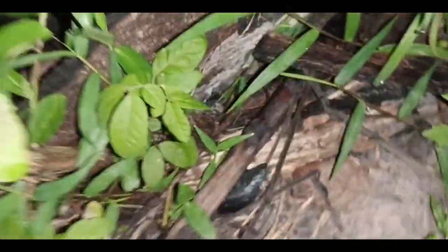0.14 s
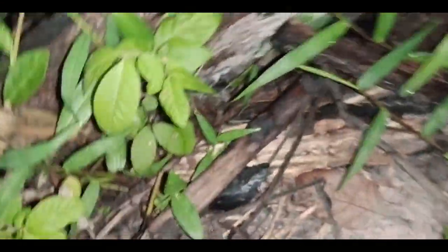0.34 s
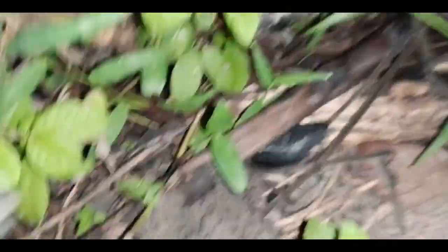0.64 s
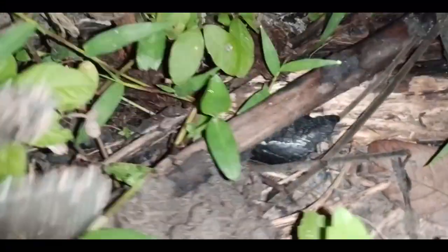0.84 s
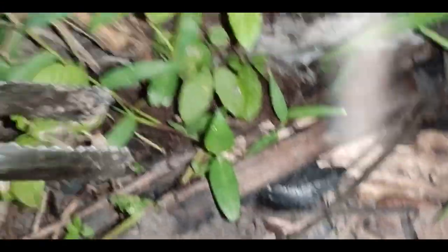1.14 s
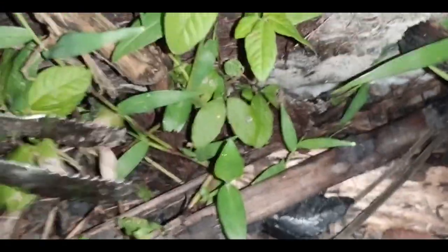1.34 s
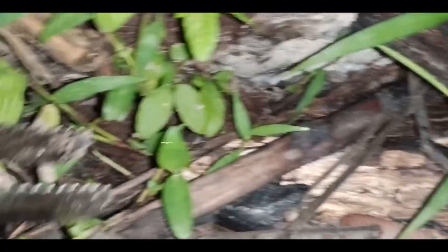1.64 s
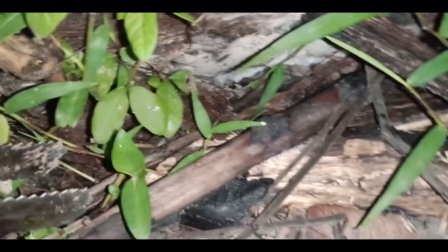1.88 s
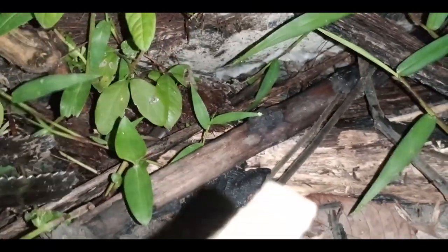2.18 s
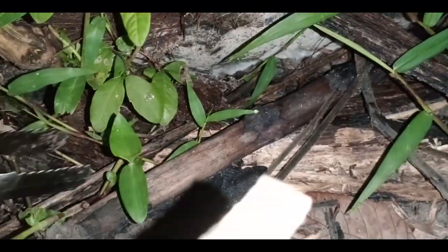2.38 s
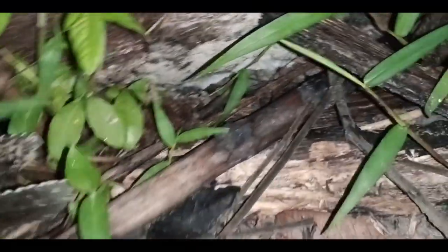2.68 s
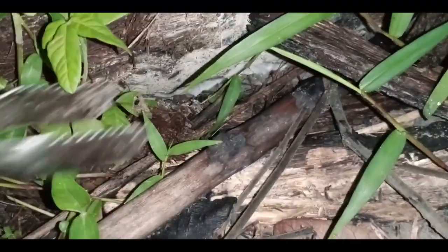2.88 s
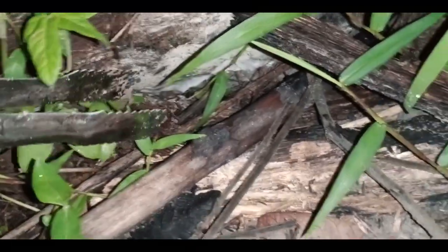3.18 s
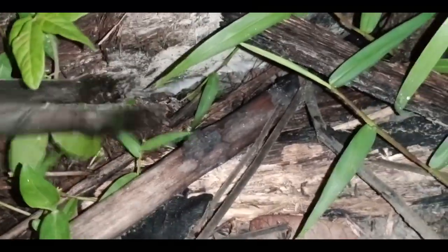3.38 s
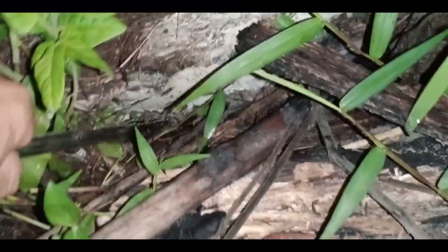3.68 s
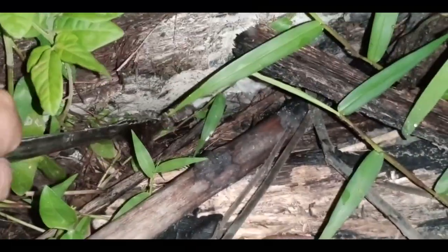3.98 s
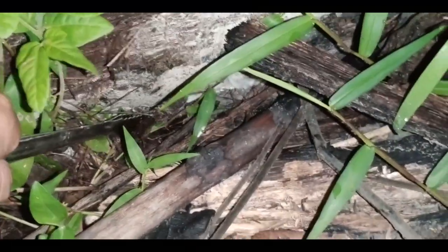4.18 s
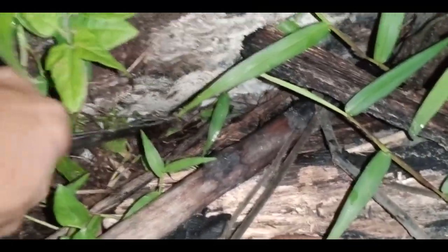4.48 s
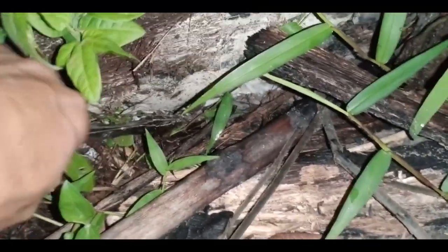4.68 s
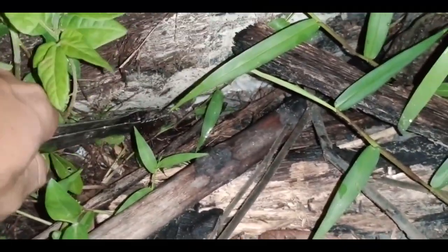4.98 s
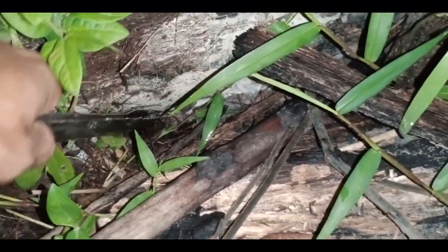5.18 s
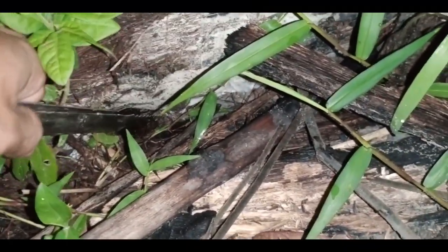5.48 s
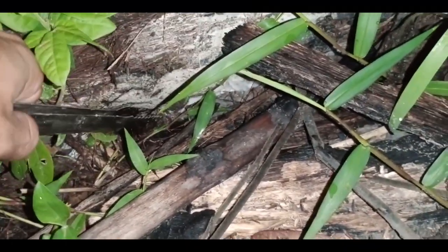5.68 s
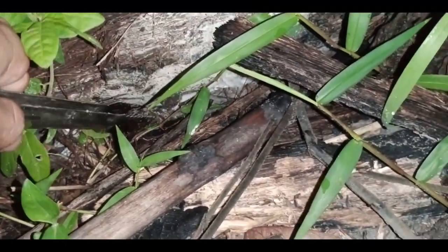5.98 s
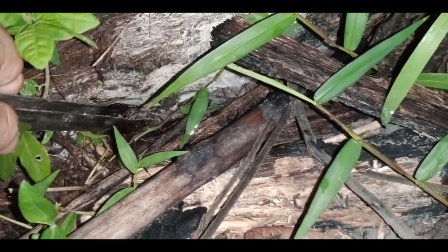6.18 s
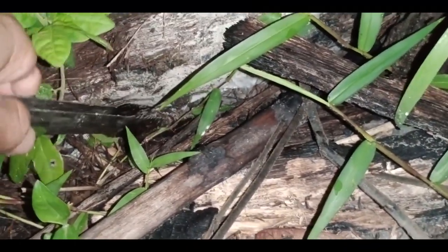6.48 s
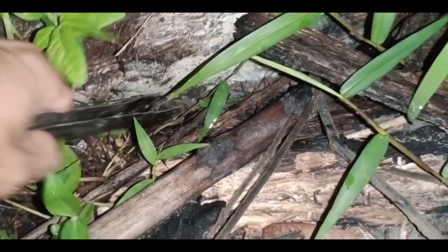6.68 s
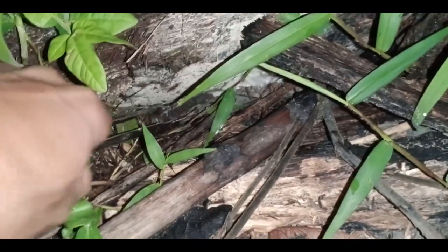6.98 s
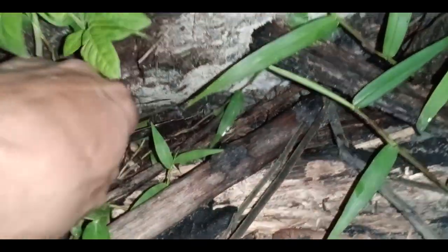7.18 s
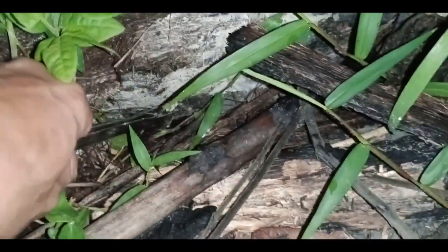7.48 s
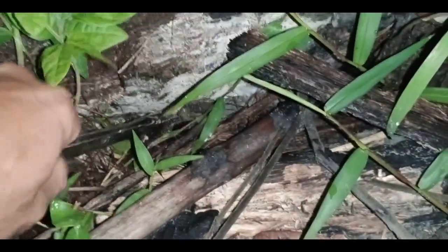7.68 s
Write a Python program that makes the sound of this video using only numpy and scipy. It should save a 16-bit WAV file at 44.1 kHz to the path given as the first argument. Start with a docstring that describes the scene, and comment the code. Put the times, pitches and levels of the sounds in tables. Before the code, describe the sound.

Outdoors at night, a handheld phone close to the undergrowth catches dull case knocks, brittle twig snaps and rustling leaves at first, then mostly insects: a wide steady hiss, fine trill, quick high chirps, thin buzzes, short falling whistles and one spell of purring. A rough crunchy scrape breaks in midway; later the chorus dips as twigs crackle in a burst, and a sharp crack comes near the end.

```python
"""A night field, heard close to a handheld phone. A far insect chorus of filtered noise swells up in the first half
second over a low rumble and a steady trill. Fingers knock the phone's case, mostly in the first second and a half,
and tongs push through leaves and twigs: grains of noise scrape, bursts of fractures snap. Near singers, built from
wing strokes, join in: chirper and buzzer within the first second, then whistler, then one spell of purrs. A harder
scrape comes after three seconds; after six the chorus sinks, and more snaps and scrapes run on to the end."""
import sys
import numpy as np
from scipy import signal
from scipy.fft import rfft, irfft
from scipy.io import wavfile
from scipy.ndimage import uniform_filter1d

SR = 44100
rng = np.random.default_rng(int(sys.argv[2]) if len(sys.argv) > 2 else 0)


def put_to_file(sound):
    """Save the sound as 16-bit audio at rate SR, in the file named by the first command-line argument."""
    columns = np.atleast_2d(sound).T  # one column per channel
    safe = np.clip(columns, -1, 1)
    whole_steps = np.round(safe * 32767)
    wavfile.write(sys.argv[1], SR, whole_steps.astype(np.int16))


N = 346185
T = np.arange(N) / SR  # time of every sample, s


# near buzzer, phrases that swell and stop short: start_s, stop_s, full_peak_db, swell_s
BUZZ_PHRASES = [(.42, 1.391, -67, 0.16), (1.72, 2.39, -52, 0.66), (2.62, 3.149, -52.5, 0.42),
                (3.423, 3.887, -52, 0.15), (4.078, 4.541, -53, 0.26), (4.718, 5.29, -54.5, 0.27),
                (5.546, 6.065, -55.5, .17), (6.38, 6.618, -61, .15), (6.795, 7.18, -56.5, 0.12),
                (7.467, 7.902, -57.5, 0.17)]


def buzzer(wing_hz=11175.0, sag_hz=634.0, soft_db=-8.5, rate_hz=132.0):
    """Fast falling strokes at a steady rate; a phrase starts soft and flat, then gathers effort."""
    out = np.zeros(N)
    for start, stop, full_db, swell in BUZZ_PHRASES:
        for t in np.arange(stop, start, -1 / rate_hz):  # counted back from the stop
            slack = max(1 - (t - start) / swell, 0)
            path_hz = (wing_hz - sag_hz * slack) * np.array([1.045, 0.955])
            gain = undb(full_db + soft_db * slack)
            add(out, t - 1 / rate_hz, gain * stroke(5.3, path_hz, rough=0.11))
    return out


# near chirper, about three chirps a second: first_closing_stroke_middle_s
CHIRP_TIMES = [0.525, 0.877, 1.2, 1.524, 1.868, 2.209, 2.51, 2.865, 3.19, 3.602, 3.919, 4.239, 4.588, 4.926,
               5.255, 5.608, 5.943, 6.314, 6.63, 6.991, 7.32, 7.699]
# a fainter chirper, evenly spaced chirps: first_call_s, gap_s, calls, peak_db
NEIGHBOUR_CHIRPS = [(.19, .211, 2, -60.5), (1.6, .32, 1, -62), (2.789, .32, 2, -62),
                    (3.688, .323, 3, -61.5)]


def chirper(gap_s=0.0318):
    """Three closing strokes arch in pitch; a fainter, higher opening stroke comes before each."""
    level_db = following(-53.5, share=0.74)
    calls = [(s, level_db[int(s * SR)]) for s in CHIRP_TIMES] + runs(NEIGHBOUR_CHIRPS)
    opening_calls = [(s - gap_s / 2, db - 5.0) for s, db in calls]
    closing_hz, opening_hz = (9600, 9560, 9900, 9880, 9450), (10250, 10200, 10000)
    closing = singer(calls, count=3, gap_s=gap_s, ms=19.0, path_hz=closing_hz, rough=0.25)
    opening = singer(opening_calls, count=3, gap_s=gap_s, ms=13.0, path_hz=opening_hz, rough=0.47)
    return closing + opening


# near whistler, evenly spaced calls: first_call_s, gap_s, calls, peak_db
WHISTLES = [(1.66, .18, 1, -53), (3.565, 0.2, 5, -60), (4.434, 0.16, 3, -55), (5.02, .18, 1, -57),
            (6.199, .13, 3, -56), (7.18, .131, 6, -57)]


def whistler():
    """Each call is two longer wing strokes, heard as falling notes."""
    return singer(runs(WHISTLES), count=2, gap_s=0.047, ms=30.0, path_hz=(4560, 4400, 4150, 3900), rough=0.15)


# near purrer, evenly spaced purrs: first_call_s, gap_s, calls, peak_db
PURRS = [(1.93, .233, 6, -52.5)]


def purrer():
    """Each purr is five short, slightly falling wing strokes."""
    return singer(runs(PURRS), count=5, gap_s=0.023, ms=11.0, path_hz=(4350, 4100), rough=0.22)


# twigs and leaves close by: start_s, body_peak_db, body_pitch_hz, length_ms, crisp_top_against_body_db
TWIG_SNAPS = [(.471, -26.5, 2350, 5.5, -37), (.482, -43, 1420, 4, -30), (0.6366, -33, 2060, 6.7, -13),
              (.678, -43.5, 2000, 3.6, -6), (.997, -21.5, 3080, 2.6, -35), (3.238, -42, 1000, 7.2, -14),
              (3.254, -36.5, 1470, 12, -17), (3.282, -32, 2400, 4.6, -4), (3.301, -33, 2600, 4., -6),
              (3.314, -32.5, 2330, 5.7, -8), (3.353, -24.5, 3000, 7.4, -4), (3.647, -42, 3000, 3., -1),
              (4.316, -41, 3000, 4., -5), (4.634, -41.5, 1320, 6.6, -18), (4.655, -41, 2260, 3.1, -25),
              (6.378, -38, 1310, 7.8, -20), (6.394, -38, 1290, 5, -16), (6.402, -35.5, 1400, 6., -10),
              (6.426, -35, 1360, 8.9, -11), (6.441, -36.5, 1500, 7.2, -15), (6.458, -32.5, 1400, 5.9, -22),
              (6.4695, -39, 1110, 2.6, -20), (6.483, -33, 1270, 3.3, -24), (6.497, -35, 1120, 2.5, -11),
              (6.512, -37, 1200, 2.9, -18), (6.5191, -33, 1310, 5.9, -9), (6.859, -41, 1280, 4.9, -14),
              (7.223, -44.5, 1400, 3.7, -20), (7.328, -42.5, 1290, 7.8, -10),
              (7.397, -42.5, 1330, 5.3, -20), (7.463, -45.5, 1620, 3.6, -1), (7.5271, -28.5, 1480, 4, -12)]


def snaps():
    """A first fracture and a few milliseconds of smaller ones ring the wood and a crisp top."""
    out = np.zeros(N)
    t = np.arange(1200) / SR
    for s, db, hz, ms, top_db in TWIG_SNAPS + crackles():
        fading = np.exp(-(1000 * t / (0.79 * ms)) ** 2)
        fractures = (rng.random(len(t)) < 0.3) * rng.standard_normal(len(t)) * fading
        fractures[0] = -2.96
        body = signal.fftconvolve(fractures, wood(t, hz))[:len(t)]
        edge = band(fractures, hz / 3, 8000)
        top = band(rng.standard_normal(len(t)) * fading, 8500, 15500)
        snap = peak_one(body) + undb(top_db) * peak_one(top) + undb(-16.5) * peak_one(edge)
        add(out, s, undb(db) * snap)
    return out


# the fallen branch and its twigs: mode_hz
BRANCH_MODES_HZ = (520, 990, 1390, 1834, 2610, 3430, 3730)


def wood(t, hz, ring_cycles=17.2):
    """The ring of the wood; a blow wakes most the modes near its own pitch, and high modes die sooner."""
    detune = 1 + 0.047 * rng.standard_normal((len(BRANCH_MODES_HZ), 1))
    modes = np.array(BRANCH_MODES_HZ)[:, None] * detune
    # short rings start louder
    weight = np.sqrt(modes / hz) * np.exp(-(np.log2(modes / hz) / 0.42) ** 2)
    # a mode has fallen 60 dB after ring_cycles
    decay = np.exp(-np.log(1000) * modes * t / ring_cycles)
    return np.sum(weight * np.sin(2 * np.pi * modes * t) * decay, axis=0)


# leaves dragged along the tongs: start_s, full_s, let_go_s, silent_s, body_level_db, crisp_top_against_body_db
LEAF_DRAGS = [(0.181, 0.255, 0.2, .6, -52.5, -24), (0.304, 0.797, 0.81, 1.3, -59.5, -14),
              (3.2, 3.28, 3.305, 3.39, -45.5, -8), (6.353, 6.389, 6.575, 6.66, -55, -15),
              (6.998, 7.4, 7.5, 7.56, -62.5, -13)]
# spectrum of the leaf body: pitch_hz, relative_level_db
LEAF_BODY = [(350, -2), (800, 0), (1400, -0.5), (2800, 1.5), (5000, -23)]
# spectrum of the crisp leaf edges: pitch_hz, relative_level_db
LEAF_EDGES = [(5500, -2), (8000, -7), (12800, 5), (15500, -11)]


def scrapes(grains_per_s=5000.0, spread_db=2.5):
    """Dense grains of unequal size shake the leaf body and its crisp edges."""
    hits = rng.random(N) < grains_per_s / SR
    size_db = spread_db * np.minimum(rng.exponential(size=N), 4.0)
    grains = hits * undb(size_db) * rng.standard_normal(N)
    grains *= undb(2.0 * walk(110))  # the leaves catch and slip
    body, crisp = colour(grains, LEAF_BODY), colour(grains, LEAF_EDGES)
    out = np.zeros(N)
    for *drag, top_db in LEAF_DRAGS:
        out += undb(drag_db(*drag)) * (body + undb(top_db) * crisp)
    return out


def drag_db(start, full, let_go, silent, db, edge_db=-27):
    """Attack, hold and release of one drag; edge_db is its level at either end against full."""
    return db + np.interp(T, [start, full, let_go, silent], [edge_db, 0, 0, edge_db], -90, -90)


def crackles(per_s=40, over_drag_db=13, middle_hz=1650, length_ms=4.5):
    """Small cracks at random moments of every drag: up to over_drag_db above its level, or 8 dB less."""
    rows = []
    for *drag, top_db in LEAF_DRAGS:
        level_db = drag_db(*drag)
        start, length = drag[0], drag[3] - drag[0]
        for at, size, pitch in rng.random((round(per_s * length), 3)):
            s = start + at * length
            peak_db = level_db[int(s * SR)] + over_drag_db - 8 * size
            rows.append((s, peak_db, middle_hz * 2 ** (pitch - 0.5), length_ms, top_db))
    return rows


# fingers on the phone's case: swing_start_s, swing_peak_db (before the case filter), swing_hz,
# opposite_flick_size (times the swing's peak)
FINGER_KNOCKS = [(0.161, -44, 120, .1), (.188, -41.5, 150, .8), (0.2332, -33.5, 278, 2.1),
                 (.2454, -38.5, 280, 2.3), (0.2543, -33, 447, 2.3), (0.2599, -41, 300, 2.1),
                 (0.3129, -40, 407, 3.6), (.322, -25.5, 444, 1.36), (0.595, -38.5, 900, 0.96),
                 (.702, -39, 704, .8), (1.225, -44, 596, .4), (1.3268, -31, 630, 0.27),
                 (1.3396, -22, 437, 0.25), (1.4488, -30, 490, 0.18), (1.4556, -38, 450, .4),
                 (1.4754, -34, 420, .4), (2.2522, -42.5, 446, 0.23), (2.49, -47, 550, .4),
                 (4.874, -40.5, 400, .15), (5.346, -42.5, 202, .3), (6.207, -37, 200, 0.73)]


def case_knocks():
    """A quick flick one way, then a heavily damped swing back."""
    out, t = np.zeros(N), np.arange(-200, 900) / SR
    for s, db, hz, flick_size in FINGER_KNOCKS:
        swing = np.sin(2 * np.pi * hz * t) * np.exp(-2.6 * hz * np.abs(t)) * (t > 0)
        width = 0.036 / hz
        flick = np.exp(-(t / width + 2.0) ** 2)
        add(out, s + t[0], undb(db) * (swing / swing.max() - flick_size * flick))
    # the case passes no treble
    return signal.sosfilt(signal.butter(3, 3800.0, fs=SR, output="sos"), out)


def triller(pulse_hz=148.5, group_hz=49.5, accents_db=(0.0, -2.5, -9.0)):
    """An endless trill in groups of three pulses, the last one weak; it follows the chorus treble."""
    out = np.zeros(N)
    for s in np.arange(0, N / SR, 1 / group_hz):
        for k, db in enumerate(accents_db):
            add(out, s + k / pulse_hz, undb(db) * stroke(4.76, (9450, 8550), rough=0.41))
    return undb(treble_db() + 8.0) * out


# far chorus over time: time_s, main_band_level_db, broad_hiss_level_db
CHORUS_LEVELS = [(0, -68.5, -69.5), (.2, -67, -68), (.33, -56, -65.5), (.5, -51, -60), (1.5, -51, -58.5),
                 (2.6, -52.5, -57.5), (4.8, -51.5, -56), (6.5, -53.5, -58.5), (6.6, -56.5, -59),
                 (7.85, -57.5, -60)]
# spectra of its main band, broad hiss, throbbing band and treble: pitch_hz, relative_level_db
MAIN_BAND = [(2500, -22), (2900, -4.5), (3300, 1.5), (3550, 1.5), (3800, -4.5), (4300, -8.5), (4600, -29)]
BROAD_HISS = [(900, -45), (1200, -12.5), (1450, -4), (1750, -4), (2250, -1), (2800, -2), (4500, -4.5),
              (5100, -1.5), (5800, -28), (7300, -28.5), (8500, -23.5)]
THROB_BAND = [(5900, -11.5), (6300, -4), (6600, -3), (6950, -12), (7300, -20.5)]
TREBLE_BAND = [(7200, -18.5), (8300, -8.5), (9200, -1), (10200, 0), (11000, 5.5), (11900, -8.5),
               (13500, -16.5), (15000, -29)]


def far_chorus(throb_per_s=4.25):
    """Countless distant insects blur into bands of hiss that flicker a little; one band throbs."""
    s, main_db, broad_db = np.transpose(CHORUS_LEVELS)
    main = undb(np.interp(T, s, main_db)) * flickering_hiss(MAIN_BAND, 0.6)
    broad = undb(np.interp(T, s, broad_db)) * flickering_hiss(BROAD_HISS, 0.8)
    # the throb grows shallower as its singers drift out of step
    depth_db = 2.8 * np.clip(1.3 - T / 6.3, 0.2, 1)
    throb_db = depth_db * np.cos(2 * np.pi * throb_per_s * (T - 1.43))
    throbbing = undb(following(-74, share=0.7) + throb_db) * flickering_hiss(THROB_BAND, 1.3)
    treble = undb(treble_db() + 5.5) * flickering_hiss(TREBLE_BAND, 1.0)
    return main + broad + throbbing + treble


def flickering_hiss(points, flicker_db):
    """Coloured noise whose level wanders at random."""
    return colour(rng.standard_normal(N), points) * undb(flicker_db * walk(25))


def following(db, share, full_song_db=-52):
    """A level, db in full song, that moves by share dB for each dB of the chorus main band."""
    return db + share * (np.interp(T, *np.transpose(CHORUS_LEVELS)[:2]) - full_song_db)


def treble_db():
    """The reference level that the treble hiss and the triller share."""
    return following(-68.5, share=0.41)


# spectrum of the distant low noise: pitch_hz, relative_level_db
LOW_NOISE = [(24, -38), (40, -15.5), (65, -3), (125, -3.5), (161, -4), (273, -13), (310, -18.5), (740, -24),
             (1200, -24), (1560, -23.5), (2640, -120)]


def rumble(level_db=-59):
    """Distant low noise, swelling slowly with a slighter, quicker waver."""
    return colour(rng.standard_normal(N), LOW_NOISE) * undb(level_db + 1.4 * walk(1.7) + 0.83 * walk(12))


def singer(calls, count, gap_s, ms, path_hz, rough):
    """Each call repeats one stroke a few times, no two quite equally loud."""
    out = np.zeros(N + SR)
    for s, db in calls:
        for k in range(count):
            gain = undb(db + 0.47 * rng.standard_normal())
            add(out, s + k * gap_s - ms / 2000, gain * stroke(ms, path_hz, rough))
    return out[:N]


def stroke(ms, path_hz, rough):
    """One wing stroke: the wing rings along a pitch path, uneven teeth make it flutter."""
    u = np.linspace(0, 1, int(ms * SR / 1000))
    hz = np.interp(u, np.linspace(0, 1, len(path_hz)), path_hz)
    hz *= 1 + 0.0074 * rng.standard_normal()
    teeth = np.interp(u, np.linspace(0, 1, 9), rng.standard_normal(9))
    ring = np.sin(2 * np.pi * (np.cumsum(hz) / SR + rng.random()))
    return np.sin(np.pi * u) * (1 + rough * teeth) * ring


def runs(table, scatter_db=1.5):
    """The calls (s, dB) of evenly spaced runs, each with a random offset in level."""
    calls = []
    for s, gap, count, db in table:
        for k in range(round(count)):
            calls.append((s + k * gap, db + scatter_db * rng.standard_normal()))
    return calls


def undb(db):
    """Gain of a level in dB."""
    return 10 ** (np.asarray(db) / 20)


def colour(x, points):
    """Filter by (Hz, dB) points, falling 15.3 dB an octave outside them; rms 1."""
    hz, db = np.transpose(points)
    f = np.fft.rfftfreq(len(x), 1 / SR) + 1
    octaves_outside = np.maximum(np.log2(hz[0] / f), 0) + np.maximum(np.log2(f / hz[-1]), 0)
    gain = undb(np.interp(np.log(f), np.log(hz), db) - 15.3 * octaves_outside)
    y = irfft(rfft(x) * gain, len(x))
    return y / np.std(y)


def band(x, low_hz, high_hz):
    """Keep the band between two pitches."""
    return signal.sosfilt(signal.butter(2, [low_hz, high_hz], "band", fs=SR, output="sos"), x)


def peak_one(x):
    """Scale to a peak of 1."""
    return x / np.max(np.abs(x))


def walk(rate):
    """Random levels held 1 / rate s and smoothed twice; spread near 1."""
    k = int(SR / rate)
    held = np.repeat(rng.standard_normal(N // k + 1), k)
    return 1.26 * uniform_filter1d(uniform_filter1d(held, k), k)[:N]


def add(out, s, sound):
    """Mix a short sound in from time s."""
    i = max(int(s * SR), 0)
    out[i:i + len(sound)] += sound[:max(len(out) - i, 0)]


def scene():
    """All sources at one microphone; grass and ground smear the near insects with a short scatter."""
    near = buzzer() + chirper() + whistler() + purrer()
    tail = rng.standard_normal(2600) * np.exp(-np.arange(2600) / SR / 0.015)
    scatter = signal.fftconvolve(near, tail / np.sqrt(np.sum(tail ** 2)))[:N]
    insects = near + undb(-5.0) * scatter + triller() + far_chorus()
    handling = snaps() + scrapes() + case_knocks()
    return (insects + handling + rumble())[None]


def record(dry):
    """The phone drops the deepest bass and cuts the top."""
    bass_cut = signal.sosfilt(signal.butter(2, 65.0, "high", fs=SR, output="sos"), dry)
    return signal.sosfilt(signal.ellip(8, 0.2, 70, 15800, fs=SR, output="sos"), bass_cut)


dry = scene()
out = record(dry)
put_to_file(out)
```